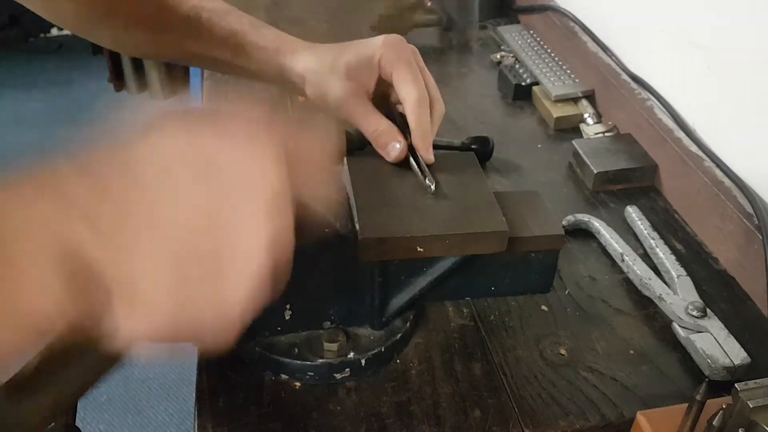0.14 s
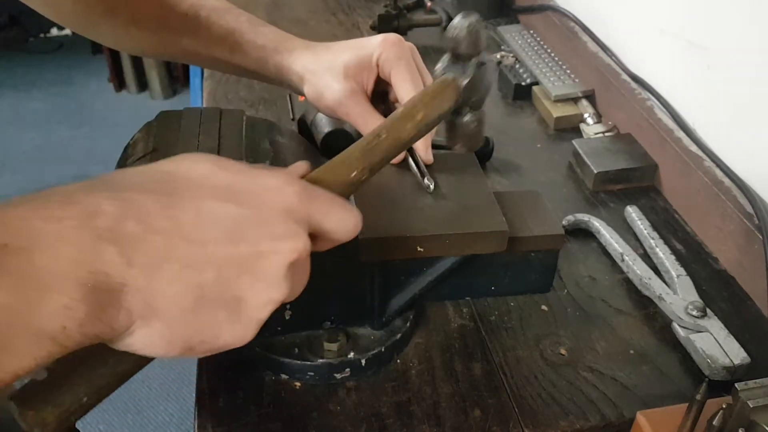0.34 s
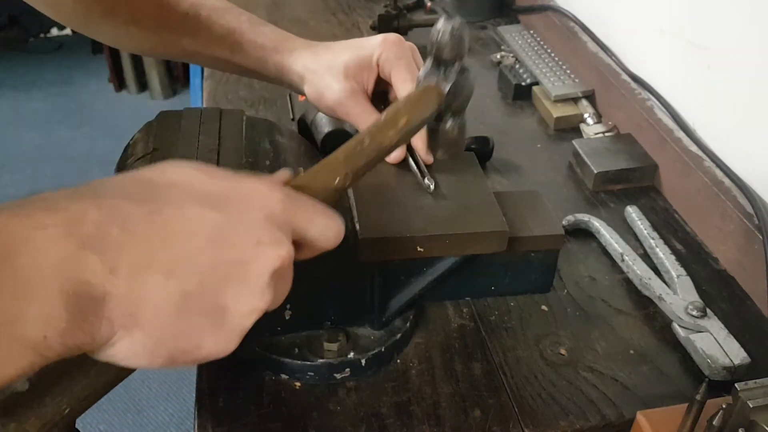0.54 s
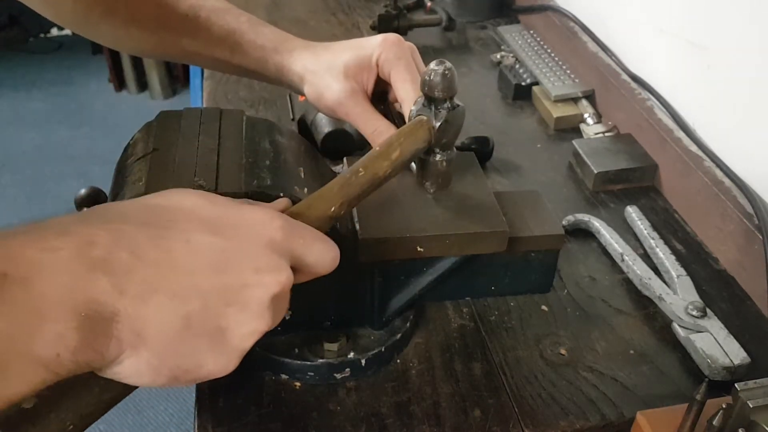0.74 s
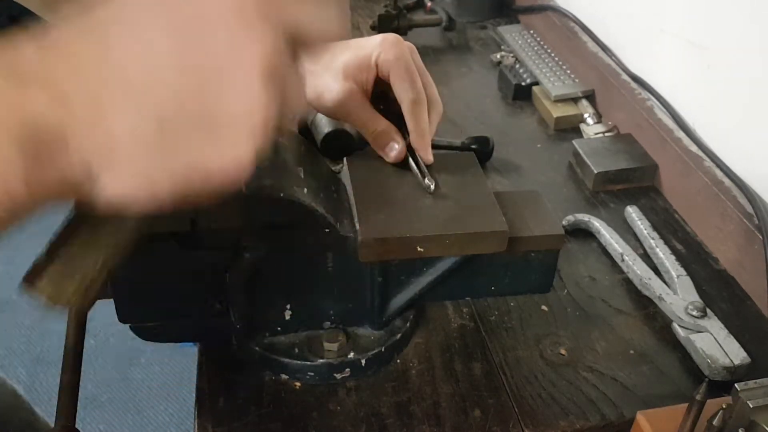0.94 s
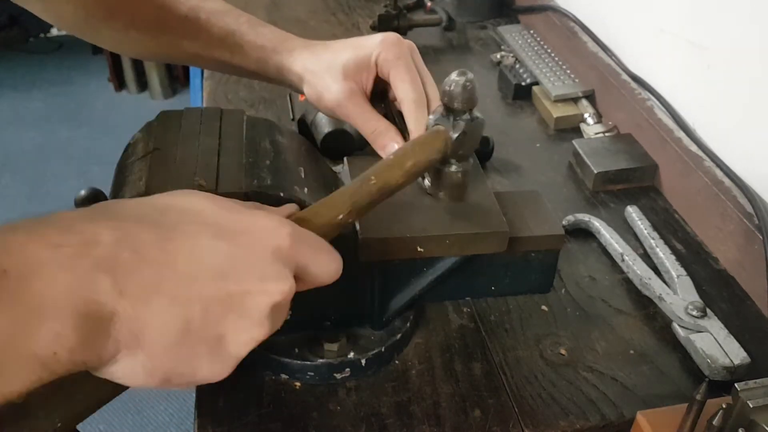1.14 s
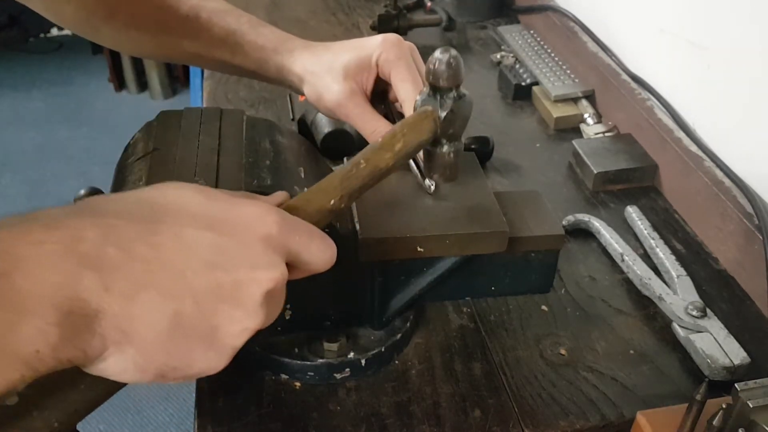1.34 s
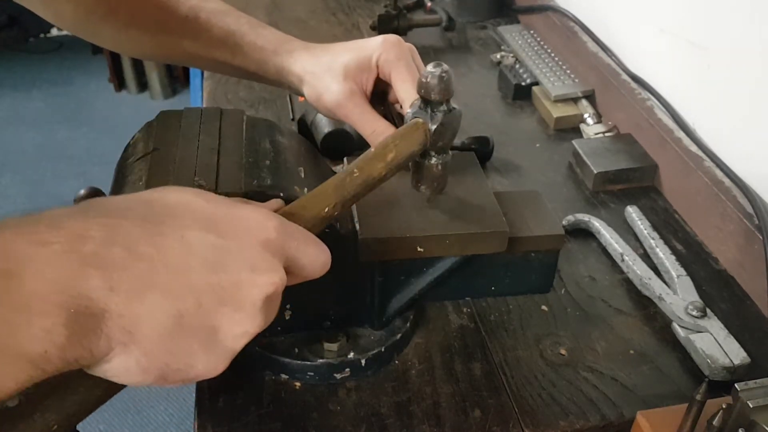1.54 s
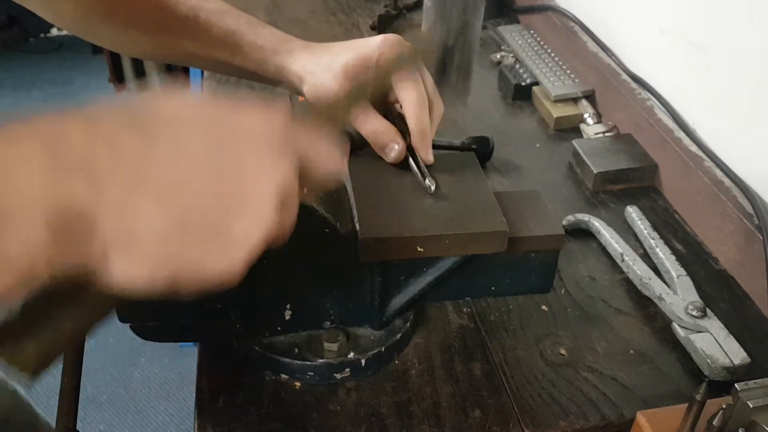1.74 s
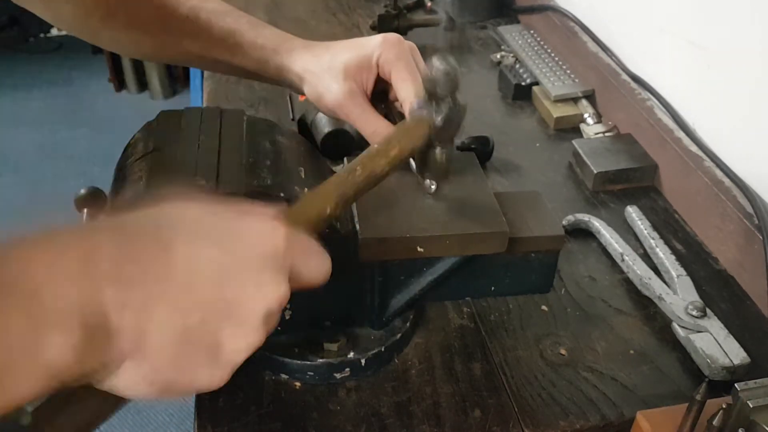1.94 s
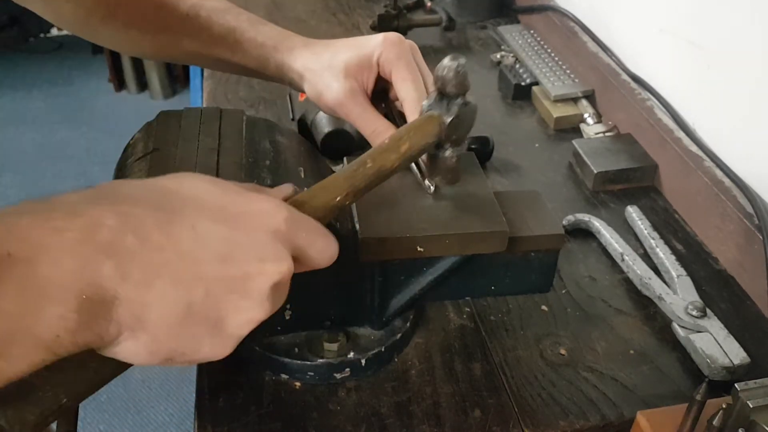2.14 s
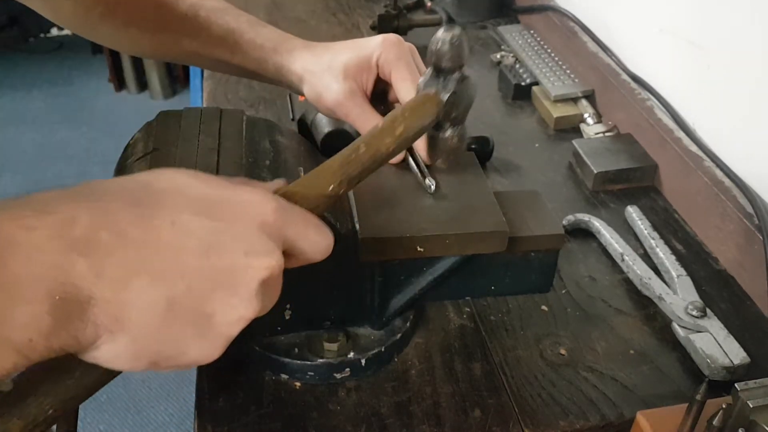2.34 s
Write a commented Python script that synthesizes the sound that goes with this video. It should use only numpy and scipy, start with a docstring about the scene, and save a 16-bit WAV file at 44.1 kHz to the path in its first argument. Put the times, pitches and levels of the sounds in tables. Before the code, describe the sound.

Hammer blows on a steel punch at a bench vice, heard close in a small workshop. An earlier ring dies away first. Loud, hard cracks land at 0.2, 1.1 and 2.0 seconds, with rough metallic ringing, low bench thumps and small parts rattling just after. Faint aiming taps click at 0.7 and 1.6. Peaks sound squashed; quiet rumble, hiss and sleeve rustle lie beneath.

```python
"""Hard, ringing cracks of steel in a small workshop: a hammer drives a punch on the steel block of a bench vice.
The ring of an earlier blow dies away first, then come three blows, with light aiming taps between them.
Shaped noise makes the cracks, rough decay, clicks and room; damped modes make the ring of vice and bench;
gliding sines make the thumps. Rumble, hiss and the rustle of a sleeve lie beneath. A look-ahead gain control
turns loud moments down and a soft clipper rounds off the peaks."""
import sys
import numpy as np
from scipy import signal
from scipy.fft import rfft, irfft, next_fast_len
from scipy.io import wavfile
from scipy.ndimage import uniform_filter1d, minimum_filter1d, map_coordinates

SR = 44100
rng = np.random.default_rng(int(sys.argv[2]) if len(sys.argv) > 2 else 0)


def transcribe(signal):
    """Save signal, clipped to [-1, 1], as a 16-bit WAV file at the path in sys.argv[1]."""
    frames = np.atleast_2d(signal).T
    limited = np.clip(frames, -1, 1)
    pcm = np.round(limited * 32767).astype(np.int16)
    wavfile.write(sys.argv[1], SR, pcm)


def elevation(decibels):
    """Turn decibel levels (scalar or array-like) into linear amplitude ratios."""
    levels = np.asarray(decibels, float)
    return 10 ** (levels / 20)


N = 105840
LEAD = SR // 2  # samples rendered before the start, for the blow that fell earlier


def unit(x):
    """Scale to rms 1."""
    return x / np.sqrt(np.mean(x ** 2) + 1e-20)


def along(points, hz):
    """Interpolate (Hz, value) points on a logarithmic frequency axis."""
    point_hz, value = np.transpose(points)
    return np.interp(np.log(hz + 1), np.log(point_hz + 1), value)


def filtered(x, response):
    """Multiply the spectrum of x by a response of frequency."""
    m = next_fast_len(x.shape[-1] + SR // 4)
    spectrum = rfft(x, m) * response(np.fft.rfftfreq(m, 1 / SR))
    return irfft(spectrum, m)[..., :x.shape[-1]]


def noise(colour, size):
    """Coloured stereo noise of rms 1: the channels share most around 80 to 200 Hz, hardly anything in the treble."""
    # How alike left and right are. Each row: frequency in Hz, correlation.
    likeness = [(40, 0.16), (80, 1), (200, 0.95), (600, .3), (2000, 0.033), (8000, 0.073)]
    # Stereo balance. Each row: frequency in Hz, left over right in dB.
    balance = [(60, 3.5), (150, -4), (380, 2), (950, -0.5), (2380, -1.5), (5980, -3.5), (15000, 4)]

    def mid_side(hz):
        angle = np.arccos(np.clip(along(likeness, hz), -1, 1)) / 2
        return elevation(along(colour, hz)) * [np.cos(angle), np.sin(angle)]

    def left_right(hz):
        return elevation(along(balance, hz) * [[.5], [-.5]])

    mid, side = filtered(rng.standard_normal((2, size)), mid_side)
    return unit(filtered(np.array([mid + side, mid - side]), left_right))


def held(t, hold_s, t60):
    """Full level for a while, then an exponential decay of 60 dB per t60 seconds."""
    return elevation(-60 * np.maximum(t - hold_s, 0) / t60)


def add(out, s, sound):
    """Mix a sound in at time s in seconds."""
    part = out[:, LEAD + round(s * SR):][:, :sound.shape[1]]
    part += sound[:, :part.shape[1]]


def level_curve(rows):
    """Turn (seconds, dB) rows into a gain for every sample."""
    return elevation(np.interp(np.arange(N) / SR, *np.transpose(rows)))


def rumble():
    """Low rumble of the room: bass noise whose level drifts."""
    # Colour of the rumble. Each row: frequency in Hz, level in dB per Hz.
    colour = [(29, -28), (50, -1.5), (91, 1), (140, -16.5), (225, -9.5), (322, -21), (400, -17),
              (520, -45.5), (880, -120)]
    # Its loudness. Each row: time in seconds, level in dB.
    levels = [(0, -60), (.2, -55.5), (.6, -67), (.9, -65.5), (1.1, -63), (1.5, -61.5), (1.75, -69.5),
              (1.88, -78.5), (2.0, -51), (2.4, -60.5)]
    return level_curve(levels) * noise(colour, size=N)


def hiss():
    """Faint hiss: mostly midrange noise whose level drifts."""
    # Colour of the hiss. Each row: frequency in Hz, level in dB per Hz.
    colour = [(180, -51.5), (300, -15.5), (440, -5), (1010, -9.5), (1690, -11), (2030, -14), (2400, -10),
              (3350, -28.5), (4020, -27), (16000, -28)]
    # Its loudness. Each row: time in seconds, level in dB.
    levels = [(0, -65), (.2, -73), (.6, -80), (1.0, -76), (1.5, -78), (1.9, -75), (2.4, -74.5)]
    return level_curve(levels) * noise(colour, size=N)


def sleeve_rustle():
    """Cloth rubbing as the arm swings: midrange noise that swells around the blows."""
    # Colour of the cloth. Each row: frequency in Hz, level in dB per Hz.
    colour = [(180, -38), (300, -8), (882, 0), (1100, -14), (1530, -2.5), (2400, -12.5), (6000, -34),
              (7800, -66.5), (13200, -120)]
    # Its loudness. Each row: time in seconds, level in dB.
    levels = [(0, -104), (.1, -63), (.2, -63.5), (.5, -86.5), (.9, -81), (1.0, -70), (1.1, -66),
              (1.2, -73.5), (1.8, -80), (1.95, -69.5), (2.1, -76.5)]
    return level_curve(levels) * noise(colour, size=N)


def short_ticks(rows, colour):
    """Small impacts: noise bursts of one colour with a soft onset and a quick decay."""
    out, t = np.zeros((2, LEAD + N)), np.arange(SR // 10) / SR
    for s, db, t60 in rows:
        burst = noise(colour, size=len(t)) * held(t, 0.0015, t60)
        add(out, s, elevation(db) * burst * np.minimum(t / 0.0012, 1))
    return out[:, LEAD:]


def raising_ticks():
    """Faint dull ticks as the hammer is raised: tiny bursts of midrange noise."""
    # Each row: start in seconds, level in dB, decay t60 in seconds.
    tick_rows = [(1.9018, -68, .012), (1.9447, -66, .018)]
    # Dull colour. Each row: frequency in Hz, level in dB per Hz.
    colour = [(500, -25.5), (1500, -1.5), (3500, -3), (5500, -29)]
    return short_ticks(tick_rows, colour)


def landing_parts():
    """Small parts that jump and land again after each blow: bright bursts of noise."""
    # Each row: start in seconds, level in dB, decay t60 in seconds.
    landing_rows = [(.2635, -21, 0.045), (1.158, -31, .04), (2.019, -30, .04)]
    # Bright colour. Each row: frequency in Hz, level in dB per Hz.
    colour = [(400, -29.5), (1500, -9.5), (4000, -7), (8000, -4.5), (10500, -8.5), (13500, 1.5),
              (16000, -8.5)]
    return short_ticks(landing_rows, colour)


def tail(colour):
    """The room's answer: noise of which each frequency dies at its own speed, building up over the first echoes."""
    # How fast the room dies away. Each row: frequency in Hz, decay t60 in seconds.
    decay = [(60, 0.47), (160, 0.27), (420, 0.56), (1100, 0.51), (2900, 0.45), (6000, 0.32), (9000, 0.3),
             (15000, .3)]
    hz, t, z = signal.stft(noise(colour, size=SR), SR, nperseg=256)
    z = z * elevation(-60 * t / along(decay, hz)[:, None])
    answer = signal.istft(z, SR, nperseg=256)[1][:, :SR]
    build_up = 1 - np.exp(-np.arange(SR) / SR / 0.0054)
    return answer * build_up


def thump(t, from_hz, to_hz, fall_s, t60):
    """A bending wave in the bench top: high pitches arrive first, so the tone glides down."""
    hz = to_hz + (from_hz - to_hz) * np.exp(-t / fall_s)
    tone = np.sin(2 * np.pi * np.cumsum(hz) / SR)
    return tone * elevation(-60 * t / t60) * (1 - np.exp(-t / 0.002)) * np.ones((2, 1))


def tap_click(t, t60):
    """Hammer set lightly on the punch: a short click of steel and a weak answer of the room."""
    # Colour of the click. Each row: frequency in Hz, level in dB per Hz.
    click_colour = [(120, -27.5), (200, -3.5), (1020, -11), (1370, -29), (2250, -7.5), (3190, -23),
                    (3760, -8.5), (5420, -20.5), (6640, -26), (7010, -19.5), (8740, -14.5), (10500, -36),
                    (15100, -16), (16000, -25)]
    # Colour of the room after a tap. Each row: frequency in Hz, level in dB per Hz.
    room_colour = [(710, -37.5), (1200, -11), (1240, -13), (1370, -10.5), (2270, 0), (2890, -11.5),
                   (3700, 2.5), (4500, -2), (5700, -18), (8200, -10), (10500, -24), (16000, -18.5)]
    room_db = -21.5
    return noise(click_colour, size=SR) * held(t, 0.0038, t60) + elevation(room_db) * tail(room_colour)


def tap_thump(t):
    """The bench under a tap: a gliding thump along the top and a low afterring of noise."""
    # Colour of the afterring. Each row: frequency in Hz, level in dB per Hz.
    thud_colour = [(18, -53), (30, -17.5), (64, -8), (115, -0.5), (188, -13), (355, -18.5), (383, -24.5),
                   (1200, -36.5), (2640, -120)]
    return thump(t, from_hz=450, to_hz=100, fall_s=.022, t60=.11) + elevation(-3) * tail(thud_colour)


def aiming_taps():
    """Light taps to aim the punch: a steel click, then the bench's thump a moment later."""
    # Each row: start in seconds, click level in dB, thump level in dB, click decay t60 in seconds.
    tap_rows = [(.7312, -42, -40, .022), (1.5805, -52, -58, .035), (1.5862, -49, -48, .03)]
    thump_lag_s = .0105
    out, t = np.zeros((2, LEAD + N)), np.arange(SR) / SR
    for s, click_db, thump_db, t60 in tap_rows:
        add(out, s, elevation(click_db) * tap_click(t, t60))
        add(out, s + thump_lag_s, elevation(thump_db) * tap_thump(t))
    return out[:, LEAD:]


def blow_crack(t):
    """Steel on steel: a briefly held crack of noise plus the shorter burst of the first contact."""
    # Colour of the crack. Each row: frequency in Hz, level in dB per Hz.
    crack_colour = [(59, -32), (100, -11), (381, -8.5), (818, -1), (1230, -17), (2300, -5.5), (3320, -15.5),
                    (3620, -10.5), (6420, -23.5), (8110, -20), (9210, -41), (16000, -34)]
    # Colour of the first contact. Each row: frequency in Hz, level in dB per Hz.
    contact_colour = [(290, -35), (500, -2.5), (1200, -2.5), (2300, 7), (6420, -12.5), (8090, -10),
                      (9220, -24.5), (12700, -13.5), (15100, -18.5), (16000, -26.5)]
    contact_db, contact_t60 = 12, 0.012  # dB, seconds
    crack = noise(crack_colour, size=SR) * held(t, hold_s=0.0047, t60=0.065)
    contact = elevation(contact_db - 60 * t / contact_t60) * noise(contact_colour, size=SR)
    return crack + contact


def rough_noise(t):
    """Rough, uneven noise after each blow that fades, and faster after about a tenth of a second."""
    # Colour of the rough noise. Each row: frequency in Hz, level in dB per Hz.
    colour = [(120, -37), (200, -7), (353, -5), (440, -5), (709, 2), (867, -7), (1940, -3.5), (3070, -10.5),
              (3370, -6), (4860, -13), (5230, -26), (5940, -24), (8300, -27), (9400, -37), (11500, -41.5),
              (14000, -34.5), (16000, -36.5)]
    fade_db_per_s, uneven_db, uneven_per_s = 131.5, 2.5, 70
    unevenness = map_coordinates(rng.standard_normal(SR // 200), [t * uneven_per_s])
    level = elevation(-fade_db_per_s * t + uneven_db * unevenness)
    return level * noise(colour, size=SR) * held(t, hold_s=.1, t60=.1)


def blow_room(treble_db):
    """The walls answer a blow: a dying tail of noise with its treble raised or lowered."""
    # Colour of the answer. Each row: frequency in Hz, level in dB per Hz.
    wall_colour = [(29, -43.5), (55, -20), (80, -4.5), (135, -2), (203, -5.5), (362, -8), (439, -17),
                   (694, -6), (884, -15), (1820, -11.5), (3100, -19), (3330, -14.5), (4790, -18),
                   (5270, -27.5), (5950, -24.5), (8140, -32.5), (9410, -39.5), (11500, -40.5), (14000, -35),
                   (16000, -37.5)]
    room_db = -7.5
    treble_shelf = [(4000, 0.0098), (9000, treble_db)]  # Hz, dB
    return elevation(room_db) * filtered(tail(wall_colour), lambda hz: elevation(along(treble_shelf, hz)))


def ring(modes, t, apart, blur_hz, steady):
    """Damped modes, each blurred to a narrow band that swells by chance; each channel has its own phase."""
    scatter_db, longest_t60 = 1.5, .5  # chance level per mode in dB; upper limit of every t60 in seconds
    hz, db, t60 = np.transpose(modes)[:, :, None]
    scattered_db = db + scatter_db * rng.standard_normal(hz.shape)
    size = elevation(scattered_db - 60 * t / np.minimum(t60, longest_t60))
    knots = rng.standard_normal((2, len(modes), SR // 200))
    # two slow random curves per mode drift its amplitude and phase
    a, b = [np.array([map_coordinates(row, [t * blur_hz], order=2) for row in part]) for part in knots]
    phase = [2 * np.pi * hz * t + side * apart[:, None] for side in (1, -1)]
    return (size * ((a + steady) * np.sin(phase) + b * np.cos(phase))).sum(1)


def hard_blows():
    """Each blow: a crack, rough noise, the ring of vice and bench, the room and a thump along the bench."""
    # Each row: start in seconds, level of the whole blow in dB, crack in dB, rough noise in dB,
    # bass in dB, room treble in dB. The first blow falls before the start.
    blow_rows = [(-.28, -8, -4, -9, 15.5, 8.5), (0.2179, -4.5, 12, 1, 3, 1), (1.1234, -3.5, 5, -1, 1.5, -5),
                 (1.9895, 3.5, -7.5, -25, -13.5, -2.5)]
    # Modes of the steel vice. Each row: frequency in Hz, level in dB, t60 in seconds before ring() limits it.
    vice_modes = [(567, -7.5, 0.46), (665, -2, 0.6), (739, 0.5, 0.42), (793, -7.5, 0.98),
                  (887, -16.5, 0.41), (1418, -6.5, 1), (1668, -9.5, 0.59), (1760, -9, 0.23),
                  (1822, -10.5, 0.16), (1910, -10.5, .4), (2190, -13, 1), (2366, -9.5, 0.67),
                  (2610, -10, 0.12), (3470, -13, 0.4)]
    # Modes of the bench. Each row: frequency in Hz, level in dB, t60 in seconds before ring() limits it.
    bench_modes = [(79, -5.5, 0.59), (129.3, 2.5, 0.45), (153.2, 7.5, 0.32), (210.4, -3.5, 0.26),
                   (250.8, -4, 0.43), (300.8, 2, .28), (354.8, 2.5, 0.35), (413, -9, 0.1)]
    # Glide of the thump: lag in seconds, first pitch in Hz, last pitch in Hz, time of fall in seconds.
    thump_lag_s, from_hz, to_hz, fall_s = .002, 1100, 125, .012
    vice_db, bench_db, thump_db = -22.5, -28, -1
    # the low ring drops by this many dB about a tenth of a second after each blow
    drop_db, drop_start_s, drop_length_s = 7.5, .1 - 0.012, 0.009
    out, t = np.zeros((2, LEAD + N)), np.arange(SR) / SR
    # stereo phase of each mode in radians, the same for every blow
    vice_apart = rng.uniform(-0.28, 1, len(vice_modes))
    bench_apart = rng.uniform(-1, 1, len(bench_modes)) / 2
    for s, db, crack_db, rough_db, bass_db, treble_db in blow_rows:
        air = elevation(crack_db) * blow_crack(t) + elevation(rough_db) * rough_noise(t) + blow_room(treble_db)
        bass_shelf = [(200, bass_db), (400, 0.015)]  # Hz, dB
        air = filtered(air, lambda hz: elevation(along(bass_shelf, hz))) * np.minimum(t / .0003, 1)
        vice = elevation(vice_db) * ring(vice_modes, t, vice_apart, blur_hz=18, steady=1.2)
        vice = vice * (1 - np.exp(-t / 0.00067))
        bench = elevation(bench_db + bass_db) * ring(bench_modes, t, bench_apart, blur_hz=10, steady=5.1)
        bench = bench * (1 - np.exp(-t / 0.005))
        bench = bench * elevation(-drop_db * np.clip((t - drop_start_s) / drop_length_s, 0, 1))
        add(out, s, elevation(db) * (air + vice + bench))
        low_thump = thump(t, from_hz, to_hz, fall_s, t60=0.13)
        add(out, s + thump_lag_s, elevation(db + bass_db + thump_db) * low_thump)
    return out[:, LEAD:]


def scene():
    """Sum of all sources: the work on the vice, the small sounds around it and the background."""
    work = hard_blows() + aiming_taps()
    small_sounds = landing_parts() + raising_ticks()
    background = rumble() + hiss() + sleeve_rustle()
    return work + small_sounds + background


def roll_off(x):
    """The treble ends steeply here."""
    return signal.sosfilt(signal.butter(12, 16000, fs=SR, output="sos"), x)


def record(dry):
    """Gain control that ducks ahead of loud moments and recovers at a steady rate, then soft clipping."""
    duck_above_db, duck_share = -8, .55  # threshold; share of the excess that is taken away
    look_ahead_s, recover_db_per_s = .013, 81.5
    clip_hardness = 6.7
    t = np.arange(N) / SR
    power = uniform_filter1d(np.mean(dry ** 2, 0), SR // 200)
    loud_db = 10 * np.log10(np.abs(power) + 1e-12)
    need_db = -duck_share * np.maximum(loud_db - duck_above_db, 0)
    early_db = minimum_filter1d(need_db, 2 * max(round(look_ahead_s * SR), 1) + 1)
    # the running minimum along a slope lets the gain rise no faster than the recovery rate
    recovery_db = recover_db_per_s * t
    gain_db = np.minimum(np.minimum.accumulate(early_db - recovery_db) + recovery_db, 0)
    x = dry * elevation(uniform_filter1d(gain_db, SR // 400))
    clipped = x / (1 + np.abs(x) ** clip_hardness) ** (1 / clip_hardness)
    return roll_off(clipped)


dry = scene()
out = record(dry)
transcribe(out)
```